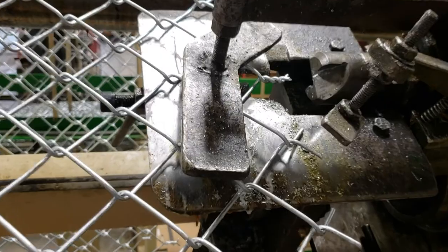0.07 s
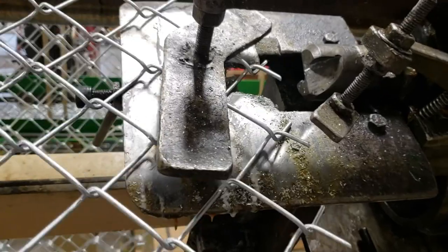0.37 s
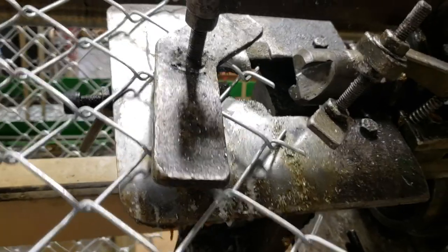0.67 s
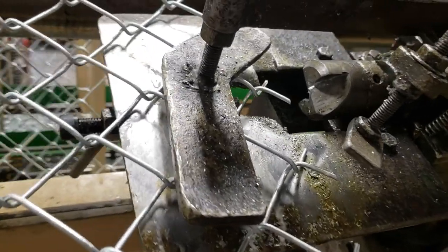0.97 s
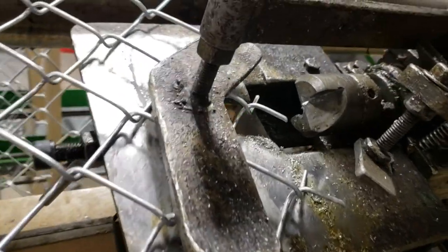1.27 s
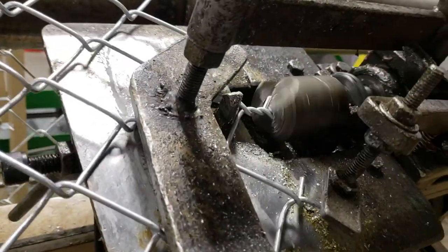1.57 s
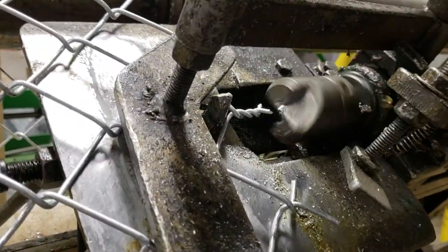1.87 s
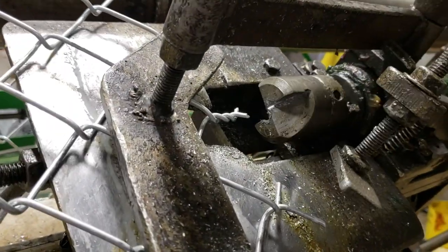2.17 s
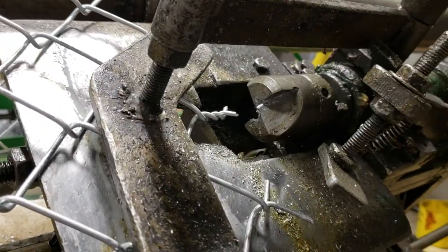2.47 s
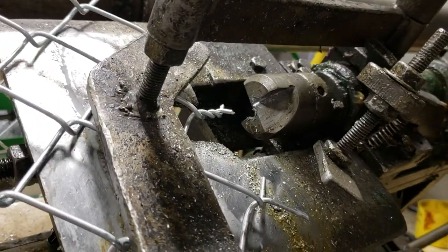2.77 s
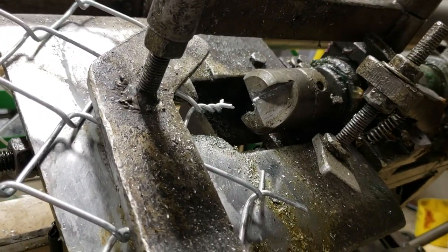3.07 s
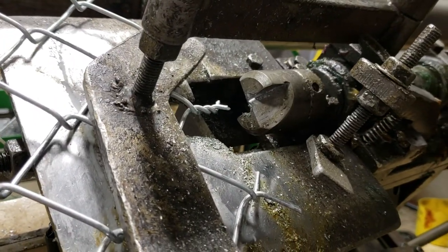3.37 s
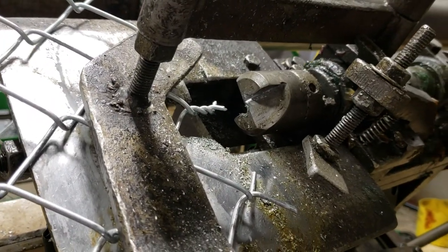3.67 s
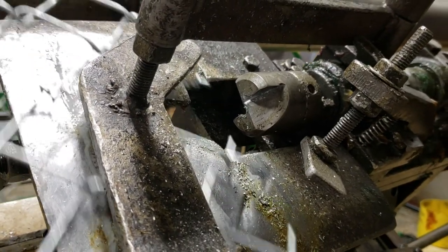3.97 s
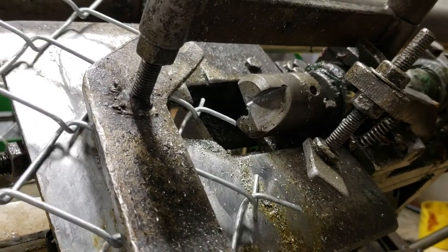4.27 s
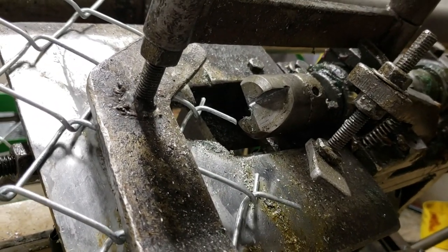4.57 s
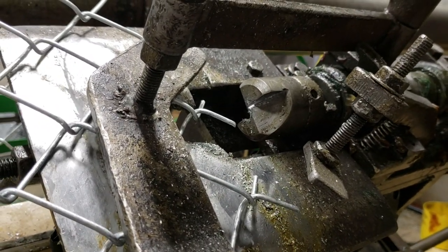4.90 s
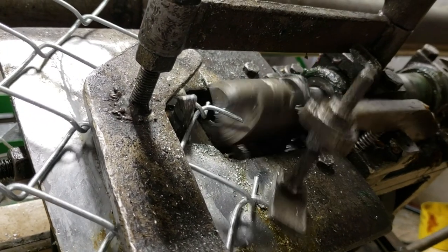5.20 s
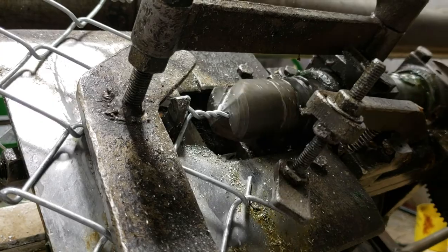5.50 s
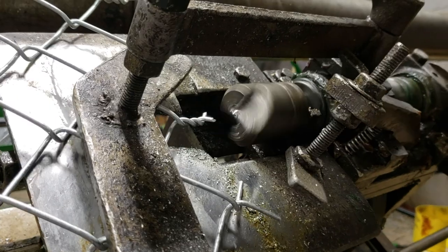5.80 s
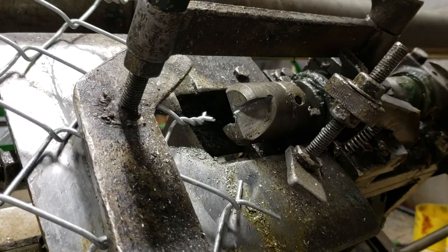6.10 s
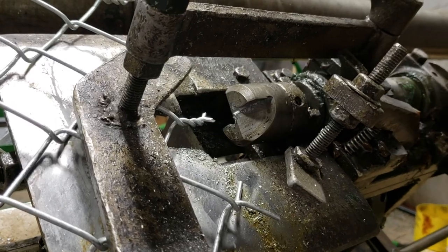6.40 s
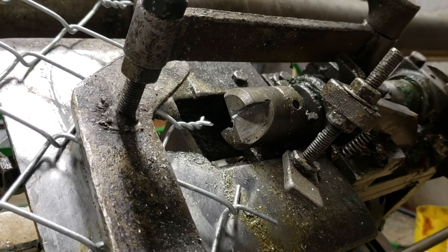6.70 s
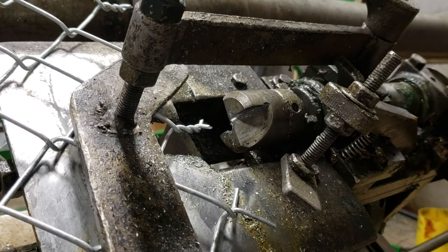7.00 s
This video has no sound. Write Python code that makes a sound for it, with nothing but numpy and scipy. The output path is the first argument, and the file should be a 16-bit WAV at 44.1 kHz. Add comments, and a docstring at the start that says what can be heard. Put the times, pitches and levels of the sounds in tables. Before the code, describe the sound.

A chain-link fence machine works close by in a factory hall, over a steady rumble and hum. It thuds and hauls the mesh forward with a loud, ringing jangle. A short puff of air follows, then two sharp metal clacks with lever clatter as a head twists the wire ends. A spinning wire rattles quickly against its steel guide, growing louder, and the whole cycle repeats.

```python
"""Chain-link fence machine

Two working cycles, heard close up in a factory hall over the rumble and hum of the drive. A spinning
wire spiral excites its steel guide by friction and impact, louder as it grows. In each haul the frame
booms, air valves vent and the links of the mesh collide and ring in free vibration. A twisting head
then strikes its stops, in and back, to knot the wire ends."""
import sys
import numpy as np
from scipy import signal
from scipy.fft import rfft, irfft
from scipy.io import wavfile
from scipy.ndimage import uniform_filter1d

SR = 44100
rng = np.random.default_rng(int(sys.argv[2]) if len(sys.argv) > 2 else 0)


def master_out(mix):
    """Clip the mix to full scale and print it as 16-bit PCM to the path in sys.argv[1]."""
    frames = np.transpose(np.atleast_2d(mix))
    ceiling = np.clip(frames, -1, 1)
    pcm = np.round(ceiling * 32767).astype(np.int16)
    wavfile.write(sys.argv[1], SR, pcm)


N = 310905
CYCLE_S = 3.746


def amp(db):
    """Amplitude ratio of a level in decibels."""
    return 10 ** (np.asarray(db) / 20)


def unit_rms(x):
    """Normalisation to an rms of 1."""
    return x / np.sqrt(np.mean(x ** 2) + 1e-20)


def at_frequency(points, hz):
    """Interpolation of rows (frequency [Hz], value) on a logarithmic axis."""
    f, value = np.transpose(points)
    return np.interp(np.log(hz + 1), np.log(f + 1), value)


def envelope(rows, column):
    """Periodic gain from one level column of a table over the cycle."""
    rows = np.array(rows)
    return amp(np.interp(np.arange(N) / SR % CYCLE_S, rows[:, 0], rows[:, column]))


def per_cycle(values):
    """Step function holding one value through each cycle."""
    return np.array(values)[(np.arange(N) / SR // CYCLE_S).astype(int)]


def repeated(rows, gains_db=(0, 0)):
    """Repetition of rows (time [s], level [dB], ...) in every cycle."""
    return [(s + k * CYCLE_S, db + gain, *rest)
            for k, gain in enumerate(gains_db) for s, db, *rest in rows]


def with_columns(rows, *shared):
    """Rows extended by the same further columns."""
    return [(*row, *shared) for row in rows]


def drift(hz):
    """Random fluctuation: low-pass Gaussian noise of rms 1."""
    f = np.fft.rfftfreq(N, 1 / SR)
    return unit_rms(irfft(rfft(rng.standard_normal(N)) * np.exp(-(f / hz) ** 2), N))


def convolve(x, response):
    """Linear response of both channels, cut to the scene's length."""
    return signal.oaconvolve(x, np.atleast_2d(response), axes=1)[:, :N]


def colour(x, spectrum, size=4096):
    """Minimum-phase filtering at unit energy: only the shape of the spectrum counts."""
    log_gain = np.log(amp(at_frequency(spectrum, abs(np.fft.fftfreq(size, 1 / SR)))))
    taps = np.fft.ifft(np.exp(np.conj(signal.hilbert(log_gain)))).real[:size // 2]
    return convolve(x, taps / np.linalg.norm(taps))


def ring(x, modes):
    """Modal superposition: a force excites damped sinusoids, together of unit energy."""
    t = np.arange(SR // 2) / SR
    response = sum(amp(db - 60 * t / t60) / np.sqrt(t60) * np.cos(2 * np.pi * hz * t)
                   for hz, db, t60 in modes)
    response[0] /= 2  # keeps the bass out of the ring
    # channels swap: the ring takes another path than the blow
    return convolve(x[::-1], response / np.linalg.norm(response))


def contacts(per_s, spread_db):
    """Friction as shot noise: tiny contacts of uneven size, each a brief burst of grit."""
    size = amp(spread_db * np.minimum(rng.exponential(1, N), 4)) * (rng.random(N) < per_s / SR)
    power = signal.lfilter([1], [1, -np.exp(-1 / (0.0022 * SR))], size ** 2)
    return unit_rms(np.sqrt(power) * rng.standard_normal((2, N)))


def bursts(rows, rise_s, hold_s, size=6144):
    """Noise transients with exponential decay: (time [s], level [dB], tilt [dB/octave], decay [s])."""
    out, t = np.zeros((2, N + SR)), np.arange(size) / SR
    octaves = np.log2(np.clip(np.fft.rfftfreq(size, 1 / SR), 200, 14000) / 3000)
    for s, db, tilt, decay_s in rows:
        noise = irfft(rfft(rng.standard_normal((2, size))) * amp(tilt * octaves), size)
        shape = (1 - np.exp(-t / rise_s)) * np.exp(-np.maximum(t - hold_s, 0) / max(decay_s, .001))
        start = max(round(s * SR), 0)
        out[:, start:start + size] += amp(db) * noise * shape
    return out[:, :N]


def clinks(rows, spread, t60, count):
    """Free vibration of struck wire in close partials: (time [s], level [dB], frequency [Hz])."""
    out, t = np.zeros((2, N + SR)), np.arange(SR // 9) / SR
    for s, db, hz in rows:
        partials = hz * (1 + spread * (np.linspace(-1, 1, count) + rng.uniform(-0.29, 0.25, count)))
        turns = partials[:, None] * t + rng.random((2, count, 1))
        tone = np.sin(2 * np.pi * turns).sum(1) * amp(-60 * t / t60) * (1 - np.exp(-t / 0.00046))
        start = round(s * SR)
        out[:, start:start + len(t)] += amp(db) * unit_rms(tone) * np.sqrt(t60)
    return out[:, :N]


def moving_contact(x, depth_db, patch_hz, patch_s):
    """A moving contact favours changing resonances: random patches of gain in time and frequency."""
    hz, t, spectra = signal.stft(x, SR, nperseg=256, noverlap=192)
    field = rng.standard_normal(spectra.shape[1:])
    across = np.exp(-(np.arange(-8, 9) * hz[1] / patch_hz) ** 2)
    along = np.exp(-(np.arange(-30, 31) * t[1] / patch_s) ** 2)
    patches = unit_rms(signal.fftconvolve(field, np.outer(across, along), "same"))
    gain = unit_rms(amp(depth_db * patches))
    return signal.istft(spectra * gain, SR, nperseg=256, noverlap=192)[1][:, :N]


def hall(x, bass_t60, treble_t60):
    """Reverberation: a diffuse tail whose treble decays first."""
    hz, t, spectra = signal.stft(rng.standard_normal((2, SR)), SR, nperseg=256)
    t60 = at_frequency([(400, bass_t60), (10000, treble_t60)], hz)[:, None]
    tail = signal.istft(spectra * amp(-60 * t / t60) * (1 - np.exp(-t / 0.0029)), SR, nperseg=256)[1]
    return convolve(x, tail / np.linalg.norm(tail[0]))


# Spectrum of the machinery's rumble (frequency [Hz], level [dB])
RUMBLE_SPECTRUM = [(25, -32), (45, -33), (85, -18), (112, -16.5), (160, -14), (250, -6.5), (320, -4.5),
                   (420, -0.5), (560, 0.5), (700, 0), (920, -0.5), (1250, -6), (2500, -3.5), (4000, -28.5)]
# The drive labours during the haul, then eases (time in cycle [s], level [dB])
DRIVE_LOAD = [(0, -42), (.26, -31), (.55, -37), (.75, -38.5), (1.4, -36), (1.6, -42.5), (2.1, -41),
              (2.8, -45), (3.35, -38.5), (3.746, -42)]
# Load in each cycle (gain [dB])
LOAD_GAINS = [-0.8, .5]
# Tones of motors and gears (frequency [Hz], level [dB])
MOTOR_TONES = [(57, -77), (120, -70), (254, -70.5), (285, -61.5), (705, -58.5), (915, -63), (7995, -58)]
def drive():
    """Rotating machinery: broadband rumble that follows the load, and randomly modulated tones."""
    rumble = unit_rms(colour(rng.standard_normal((2, N)), RUMBLE_SPECTRUM))
    rumble *= envelope(DRIVE_LOAD, column=1) * amp(0.68 * drift(hz=60))
    tones, quadrature = np.zeros((2, N)), [[0], [np.pi / 2]]
    for hz, db in MOTOR_TONES:
        turns = np.cumsum(hz + 4.54 * drift(hz=14.5)) / SR
        tones += np.sqrt(2) * amp(db + 2.1 * drift(hz=13)) * np.sin(2 * np.pi * turns + quadrature)
    return amp(per_cycle(LOAD_GAINS)) * rumble + tones


# Air valves vent (time in cycle [s], level [dB])
VALVE_PUFFS = [(.118, -25), (1.2375, -22)]
# Spectrum of the exhaust (frequency [Hz], level [dB])
AIR_SPECTRUM = [(1500, -31), (4000, 6.5), (7500, 6), (9800, -4), (12000, 9.5), (15000, 6), (16000, 0)]
def valves():
    """Jet noise: exhaust air escapes in short puffs."""
    tilt, decay_s = -4.5, 0.073
    puffs = with_columns(repeated(VALVE_PUFFS), tilt, decay_s)
    return amp(1.5) * colour(bursts(puffs, rise_s=0.0035, hold_s=0.018, size=24576), AIR_SPECTRUM)


# Response of the loose levers (frequency [Hz], level [dB])
LEVER_SPECTRUM = [(100, -46), (170, -17.5), (551, -3.5), (617, 1), (820, -5), (1620, -1), (2370, -3.5),
                  (4190, -6), (5260, -10), (7690, -16), (9120, -25), (13800, -17), (15800, -31)]
def levers(force):
    """Forced vibration: the levers filter a force through their broad resonances."""
    return colour(force, LEVER_SPECTRUM)


# Blows on the frame (time in cycle [s], level [dB], tilt [dB/octave], decay [s])
FRAME_THUDS = [(.036, -14, 0, 0.038), (.196, -21.5, -4, .021), (.232, -17.5, 0.5, 0.017),
               (.468, -20.5, -.5, 0.017)]
# Response of the frame (frequency [Hz], level [dB])
FRAME_SPECTRUM = [(30, -41), (60, -28), (100, 4), (160, 0), (230, -11), (440, 0), (650, 10.5), (1500, -31),
                  (5000, -52)]
# Modes of the frame (frequency [Hz], level [dB], T60 [s])
FRAME_RESONANCES = [(115, -22, 0.072), (181.5, -15, 0.26), (235, -11, 0.49), (292, -11, 0.08),
                    (370, -11, 0.54), (433.5, 0.5, 0.2), (463, 4, 0.095), (534, -11, .1), (833, -6, 0.11)]
def frame():
    """Structure-borne sound: as the haul engages and stops, the frame booms and shakes its levers."""
    force = bursts(repeated(FRAME_THUDS), rise_s=0.0062, hold_s=0.0088, size=16384)
    boom = amp(-20.5) * colour(force, FRAME_SPECTRUM) + amp(-10.5) * ring(force, FRAME_RESONANCES)
    return boom + amp(-3.5) * levers(force)


# The head strikes its stops (time in [s], level [dB], time back [s], level [dB])
HEAD_STROKES = [(1.401, -8, 1.814, -7.5), (5.188, -6, 5.603, -7.5)]
# Wire ends snap free (time in cycle [s], level [dB], tilt [dB/octave])
WIRE_SNAPS = [(.286, -10.5, 7), (.407, -7.5, 3), (.6665, -18.5, 8), (1.5097, -12.5, 4.5)]
# Levers take up their play and settle (time from inward stroke [s], level [dB], decay [s])
LEVER_PLAY = [(-.028, -13, .018), (.005, -8.5, .012), (.038, -9.5, 0.014), (.063, -14.5, 0.017),
              (.376, -15.5, 0.016), (.438, -14.5, 0.0073), (.634, -11, .008), (.65, -12.5, 0.0085),
              (.715, -15.5, 0.0082), (.759, -17.5, 0.0097)]
# Response of the head (frequency [Hz], level [dB])
HEAD_SPECTRUM = [(180, -44), (300, -18.5), (759, -7), (1500, -1.5), (2680, -6), (3060, -6), (4550, -0.5),
                 (4950, -1), (5740, -8.5), (7740, -8), (8990, -21), (10400, -29), (11300, -19.5),
                 (14300, -21), (15800, -19)]
# Modes of the head (frequency [Hz], level [dB], T60 [s])
HEAD_RESONANCES = [(623, -4, 0.12), (1620, -5, 0.044), (1594, 13, 0.056), (3190, 8, 0.06),
                   (3760, -25, 0.028), (4120, -20, 0.016), (5260, -10, .025), (5830, -5, 0.011),
                   (7660, 5, 0.031)]
def twisting_head():
    """Impact excitation: stops and snapping wire ends ring the head; backlash rattles its levers."""
    stop_tilt, lever_tilt = 0.5, 0.2  # dB/octave
    stop_decay_s, snap_decay_s = 0.0043, 0.0036
    stops = with_columns(np.reshape(HEAD_STROKES, (-1, 2)), stop_tilt, stop_decay_s)
    snaps = with_columns(repeated(WIRE_SNAPS), snap_decay_s)
    taps = [(stroke[0] + s, db, lever_tilt, decay_s)
            for stroke in HEAD_STROKES for s, db, decay_s in LEVER_PLAY]
    force = bursts(stops, rise_s=0.00034, hold_s=0.0013)
    force += amp(-8.5) * bursts(snaps, rise_s=0.00047, hold_s=0.0014)
    backlash = amp(-8.5) * bursts(taps, rise_s=0.0009, hold_s=0.0029)
    clatter = moving_contact(levers(backlash), depth_db=3.0, patch_hz=253, patch_s=0.0059)
    return colour(force, HEAD_SPECTRUM) + amp(-9.0) * ring(force, HEAD_RESONANCES) + clatter


# The mesh is hauled on, then swings out (time in cycle [s], jangle [dB], sliding [dB])
HAUL = [(.135, -35, -50.5), (.205, -25.5, -25.5), (.255, -34, -30), (.32, -19.5, -25.5), (.375, -26, -51.5),
        (.46, -19.5, -38.5), (.53, -32, -48.5), (.62, -35, -56), (.74, -37.5, -62)]
# Links collide (time in cycle [s], crash [dB], tilt [dB/octave], ringing [dB], frequency [Hz])
LINK_CLASHES = [(.2035, -10.5, -1, -8.5, 2150), (.285, -12.5, -1, -15, 3735), (.3065, -5.5, 4.5, -3, 951),
                (.322, -3, 1.5, -9.5, 2680), (.336, -5.5, -0.5, -7.5, 4390), (.382, -14, -2.5, -1.5, 2290),
                (.408, -5, 2.5, -10, 940), (.444, -3, -.5, -3.5, 2195), (.455, -10, 3, -6, 2890),
                (.468, -8, -3.5, -11, 1805), (.49, -7.5, 2, -16, 2080), (.557, -18.5, -4, -19, 2190),
                (.631, -13.5, -1.5, -12, 2296)]
# Strength of the crashes in each haul (gain [dB])
CRASH_GAINS = [-0.6, 0.8]
# Response of the mesh (frequency [Hz], level [dB])
MESH_SPECTRUM = [(150, -43), (250, -15.5), (443, -10.5), (660, -13.5), (967, 0.5), (1390, 1.5), (1710, 6),
                 (2340, -2), (2690, 5), (2990, 0.5), (4300, -0.5), (6750, -7.5), (10100, -25), (14500, -42),
                 (15800, -43)]
# Modes of the mesh (frequency [Hz], level [dB], T60 [s])
MESH_RESONANCES = [(860, -13, 0.097), (1010, -13, 0.026), (1700, -5.5, 0.27), (1907, -6, 0.064),
                   (2110, -10, 0.2), (2540, -18.5, 0.049), (2675, -10, 0.071), (2670, -11, 0.34),
                   (3450, -10, 0.11)]
# Spectrum of mesh sliding on the bed (frequency [Hz], level [dB])
SLIDE_SPECTRUM = [(700, -19.5), (1500, -5), (1940, 4), (3270, -1.5), (4060, 4), (5670, -4), (7900, 0.5),
                  (8700, -14), (10500, -10), (14800, -1.5), (16000, -7)]
def mesh():
    """Sliding friction and collision: the mesh drags over the bed while its links clash and ring."""
    crash_decay_s, detune = 0.014, 0.024  # a link's pitch varies from haul to haul
    t, clashes = np.arange(N) / SR % CYCLE_S, np.array(LINK_CLASHES)
    crashes = with_columns(repeated(clashes[:, :3], CRASH_GAINS), crash_decay_s)
    moving = uniform_filter1d(1. * ((t > HAUL[0][0]) & (t < HAUL[-1][0])), size=1000)
    force = amp(-10.0) * bursts(crashes, rise_s=0.00067, hold_s=0.0011)
    force += amp(-3.0) * moving * envelope(HAUL, column=1) * contacts(per_s=700, spread_db=2.5)
    sliding = amp(11.0) * moving * envelope(HAUL, column=2) * contacts(per_s=2400, spread_db=1.0)
    jangle = amp(0.5) * colour(force, MESH_SPECTRUM) + amp(-8.5) * ring(force, MESH_RESONANCES)
    jangle += colour(sliding, SLIDE_SPECTRUM)
    struck = [(s, db, hz * (1 + detune * rng.standard_normal()))
              for s, db, hz in repeated(clashes[:, [0, 3, 4]])]
    links = amp(-10.5) * clinks(struck, spread=0.092, t60=0.071, count=5)
    return moving_contact(jangle, depth_db=3.0, patch_hz=250, patch_s=0.018) + links


# The spiral whips hard against its guide (time [s], level [dB])
HARD_KNOCKS = [(0.9538, -16), (1.1069, -15), (1.1265, -17), (1.9487, -17), (2.2705, -17), (2.4203, -15),
               (2.5733, -16), (2.696, -17), (3.0791, -11), (3.225, -10.5), (3.322, -9.5), (3.3885, -11),
               (3.4062, -9), (3.548, -9.5), (3.652, -9), (4.7, -15.5), (4.8607, -20), (5.3794, -21.5),
               (5.712, -18.5), (5.8435, -15.5), (6.0137, -15), (6.0921, -16), (6.1382, -18.5),
               (6.1643, -16.5), (6.3648, -17), (6.8255, -11.5)]
def spiral_knocks(turns, strength):
    """Periodic impact: two uneven touches a turn, displaced by hard knocks; (time [s], level [dB])."""
    trail_s, trail_db, spread_db = .027, -.5, 1.5
    at = np.flatnonzero(np.diff(np.floor(turns)) > 0)
    levels = 20 * np.log10(strength[at, None]) + spread_db * rng.standard_normal((len(at), 2))
    touches = [*zip(at / SR, levels[:, 0]), *zip(at / SR + trail_s, levels[:, 1] + trail_db)]
    hard_s = np.array(HARD_KNOCKS)[:, 0]
    return [(s, db if abs(hard_s - s).min() > .018 else -np.inf) for s, db in touches] + list(HARD_KNOCKS)


# Partial clusters of the struck spiral (frequency [Hz], level [dB])
CHIRP_PARTIALS = [(2500, 0), (4470, 9.5)]
def spiral_chirps(knocks):
    """Bending vibration: the free length of wire, and so its pitch, differs from knock to knock."""
    s, db = np.transpose(knocks)
    detune, ping = rng.standard_normal((len(s), 2)).T
    pitch_ratio = 1 + 0.0246 * detune
    ping_db = db + 3.5 * np.minimum(ping, 1)  # some knocks ping, others stay dry
    return sum(clinks(zip(s, ping_db + partial_db, hz * pitch_ratio), spread=0.0299, t60=0.1, count=3)
               for hz, partial_db in CHIRP_PARTIALS)


# The spiral grows louder until cut off (time in cycle [s], rubbing [dB], scrape [dB], knocks [dB])
SPIRAL_FEED = [(0, -28, -32, -24), (.17, -34, -64, -29), (.7, -38.5, -43.5, -29), (1.4, -35.5, -44, -26.5),
               (2.1, -36, -45, -23), (2.75, -34, -39.5, -20), (3.1, -30, -35.5, -16),
               (3.42, -24.5, -31.5, -15), (3.746, -29.5, -32, -26.5)]
# One leading touch in each cycle, setting the phase of rotation (time [s])
LEAD_TOUCHES = [2.696, 6.3645]
# Response of the steel guide (frequency [Hz], level [dB])
GUIDE_SPECTRUM = [(200, -39.5), (350, -9.5), (565, -16), (828, -4), (1200, -5.5), (1700, -2.5),
                  (2450, -0.5), (3200, -4), (4450, 0), (5430, -8.5), (7700, -6.5), (9200, -19),
                  (15000, -13), (16000, -14)]
# Spectrum of the fine scrape (frequency [Hz], level [dB])
SCRAPE_SPECTRUM = [(300, -58), (4000, 13.5), (7500, 13), (9800, 0), (12000, 9), (15000, 10.5), (16000, -3)]
def spiral():
    """Friction modulated by rotation: the spiral rubs and knocks on its guide, pressing once a turn."""
    turns_per_s, press_depth = 13.275, .2
    turns = turns_per_s * (np.arange(N) / SR - per_cycle(LEAD_TOUCHES))
    knocks = spiral_knocks(turns, envelope(SPIRAL_FEED, column=3))
    pressing = (.5 + .5 * np.cos(2 * np.pi * turns)) ** 2
    rubbing = envelope(SPIRAL_FEED, column=1) * contacts(per_s=970, spread_db=1.0)
    rubbing *= amp(0.79 * drift(hz=40)) * (1 + press_depth * pressing)
    tilt, decay_s = 1.2, 0.012
    knocking = bursts(with_columns(knocks, tilt, decay_s), rise_s=0.00065, hold_s=0.002)
    force = amp(1.4) * rubbing + amp(-8.0) * knocking
    chirps = amp(-24.0) * spiral_chirps(knocks)
    grit = colour(contacts(per_s=2800, spread_db=4.5), SCRAPE_SPECTRUM)
    scrape = amp(2.0) * envelope(SPIRAL_FEED, column=2) * grit
    rattle = amp(-0.5) * colour(force, GUIDE_SPECTRUM) + scrape
    return moving_contact(rattle, depth_db=2.4, patch_hz=220, patch_s=0.008) + chirps


# Likeness of left and right (frequency [Hz], correlation [-1 to 1])
CORRELATION = [(60, 0.9), (130, 0.96), (290, 0.91), (640, 0.66), (1000, 0.25), (1400, -0.32), (2200, -0.2),
               (4000, -0.03), (15000, -0.0092)]
def spaced_microphones(x):
    """Spatial coherence: two points in a sound field agree only at long wavelengths."""
    left, right = rfft(x)
    hz = np.fft.rfftfreq(N, 1 / SR)
    correlation = np.clip(at_frequency(CORRELATION, hz), -.99, .99)
    mid = (left + right) * np.sqrt(1 + correlation) / 2
    side = (left - right) * np.sqrt(1 - correlation) / 2
    left_over_right_db = at_frequency([(250, 1.0), (1000, -0.57), (4000, -1.0), (10000, 0.89)], hz)
    lean = amp(left_over_right_db / 2)
    return irfft(np.array([(mid + side) * lean, (mid - side) / lean]), N)


def scene():
    """Superposition of all sources, with reverberation of the mesh, head and frame."""
    impacts = mesh() + twisting_head() + frame()
    direct = impacts + spiral() + valves()
    reverberation = amp(-8.5) * hall(impacts, bass_t60=0.67, treble_t60=0.32)
    return spaced_microphones(direct + reverberation + drive())


def record(dry):
    """Band limiting and saturation: deep bass is thinned, peaks round off, the top treble is cut."""
    bass_cut_hz, treble_cut_hz = 45, 15980
    thin = signal.sosfilt(signal.butter(2, bass_cut_hz, "highpass", fs=SR, output="sos"), dry)
    rounded = thin / (1 + thin ** 6) ** (1 / 6)
    lowpass = signal.firwin(511, treble_cut_hz, window=("kaiser", 9), fs=SR)
    return signal.oaconvolve(rounded, lowpass[None], "same", axes=1)


dry = scene()
out = record(dry)
master_out(out)
```